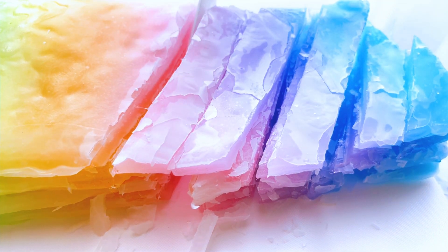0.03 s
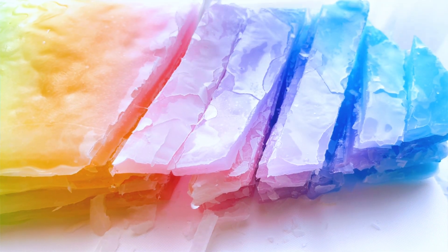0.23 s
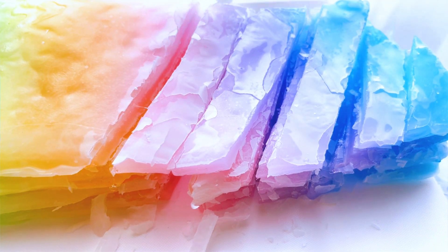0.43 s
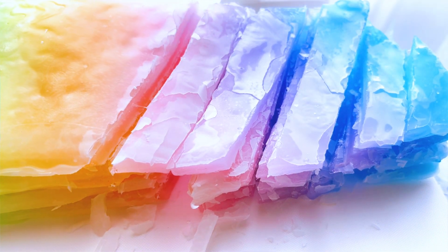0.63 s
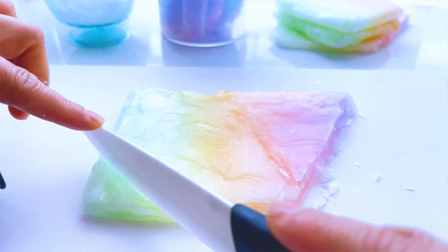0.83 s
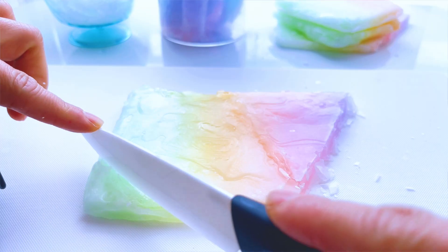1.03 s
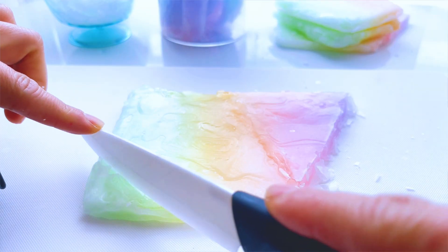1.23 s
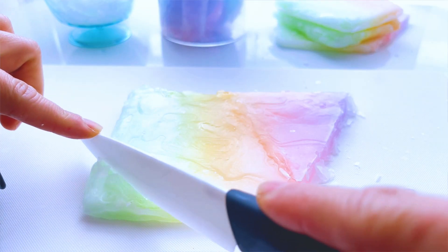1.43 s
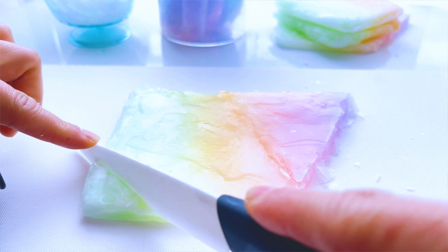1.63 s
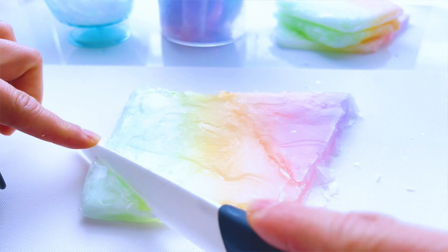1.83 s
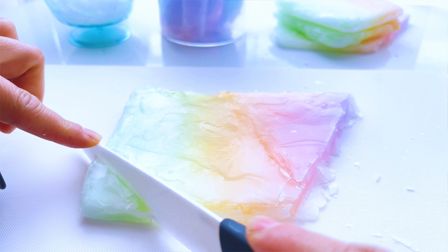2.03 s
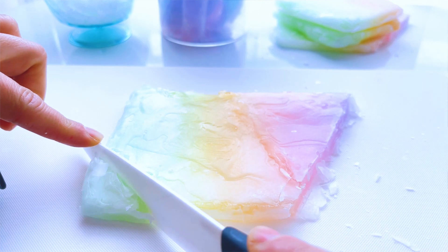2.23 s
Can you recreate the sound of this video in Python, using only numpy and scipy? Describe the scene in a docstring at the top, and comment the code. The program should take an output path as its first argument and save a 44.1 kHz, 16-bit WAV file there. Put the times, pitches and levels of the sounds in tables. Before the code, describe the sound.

Loud cracking crunch of a knife cutting waxed sponge, then a knock and smaller crackles.

```python
"""Knife cutting wax-coated sponge

Two close-up scenes on a board, loud enough to overload the microphone. First a thick block splits:
sharp cracks over a crunch of tiny cells breaking, each crack thumping the block. After a sudden switch,
the knife knocks twice, ticks on a thin slab's crust, breaks in, meets the board and is drawn back."""
import sys
import numpy as np
from scipy import signal
from scipy.fft import rfft, irfft, next_fast_len
from scipy.io import wavfile

SR = 44100
rng = np.random.default_rng(int(sys.argv[2]) if len(sys.argv) > 2 else 0)


def master(y):
    """Save y as 16-bit WAV."""
    cut = np.clip(np.atleast_2d(y).T, -1, 1)
    pcm = np.round(cut * 32767)  # scale
    wavfile.write(sys.argv[1], SR, pcm.astype(np.int16))


N = 100151

# The block's cracks. Each row: start in seconds, level in dB, flake pitch in Hz, thump strength in dB.
CRACKS = [(0.0155, -17.5, 2460, -23), (0.0232, -16.5, 2480, -6.5), (0.036, 0.5, 2680, -15.5),
          (0.1378, -16.5, 2762, -40.5), (0.2746, -22, 2780, -8.5), (.312, 11, 3290, -20.5),
          (0.3251, -5.5, 1830, -23), (0.33, 0, 1900, -7), (0.3453, 2.5, 5000, -4), (0.35, 4, 1165, 0.5),
          (0.366, 11, 1840, -1.5), (.392, 5.5, 3740, -8), (0.419, 7.5, 2537, -0.5),
          (0.4216, 10, 1277, -22.5), (0.4702, -8.5, 2780, -25.5)]
# The tone of a crack. Each row: frequency in Hz, level in dB.
CRACK_TONE = [(200, -16.5), (400, -8), (1200, -10.5), (2100, -4.5), (4500, -12.5), (10300, -16.5),
              (15500, -33.5)]
# The block's weaker notes. Each row: pitch in Hz, level in dB, seconds to fade by 60 dB.
BLOCK_NOTES = [(112, -6, 0.22), (143.8, -5, 0.17), (176, -3.5, 0.19), (261.7, -6, 0.26)]
def cracks():
    """Small flakes snap high and short, large ones low and long; each thumps the block."""
    middle_hz = 2650  # the pitch of a medium flake
    snaps, thumps = np.zeros(N), np.zeros(N)
    for start, db, hz, thump_db in CRACKS:
        snap = burst(CRACK_TONE, fade_s=0.012 * np.sqrt(middle_hz / hz),
                     tilt_db=6 * np.log2(hz / middle_hz))
        flake = ring([(hz, 2.5, 26 / hz)], rise_s=1 / hz)  # dies away in 26 vibrations
        add(snaps, start, amp(db) * (snap + flake))
        # Only hard thumps wake the weaker notes.
        add(thumps, start, amp(1.74 * thump_db) * ring(BLOCK_NOTES, rise_s=0.0036))
    return snaps, thumps


# How loud the crunch is. Each row: time in seconds, level in dB.
CRUNCH_LEVELS = [(0, -36.5), (.022, -15.5), (.06, -27.5), (.125, -32), (.19, -49.5), (.255, -41.5),
                 (.305, -29), (.325, -19), (.44, -19), (.5, -25.5), (.57, -47), (.89, -59.5)]
# The tone of the crunch. Each row: frequency in Hz, level in dB.
CRUNCH_TONE = [(90, -6), (300, -1), (700, -14.5), (1700, -6.5), (2650, -1.5), (3800, -10.5), (10300, -12.5),
               (12300, -22)]
def crunch():
    """The block's tiny cells break, each with a click."""
    return crackle(CRUNCH_LEVELS, CRUNCH_TONE, per_second=800, spread_db=4.5, hiss_db=-4.5)


def main_note():
    """The block's strongest note is one clean vibration, topped up by the thumps and the crunch."""
    hz, t = 219.1, ages()
    pulse = fade(t, fade_s=0.096) * (1 - np.exp(-t * hz))
    strength = np.zeros(N)
    for start, _, _, thump_db in CRACKS:
        add(strength, start, amp(thump_db - 3) * pulse)
    push = level_curve(CRUNCH_LEVELS) ** 1.316  # soft crunch barely feeds the note
    strength += amp(13.5) * signal.fftconvolve(push, pulse / pulse.sum())[:N]
    return strength * np.sin(2 * np.pi * hz * np.arange(N) / SR)


# The knife's knocks. Each row: start in seconds, hit level in dB, treble lift in dB per octave,
# board thud in dB, hollow ring in dB.
KNOCKS = [(1.029, 13, 1, -4.5, 0.5), (1.082, -3, 1, -14.5, -7), (1.463, -3, 6, -19, -25.5),
          (1.4757, -16, 6, -12, -14)]
# The board's notes and the hollow ring. Each row: pitch in Hz, level in dB, seconds to fade by 60 dB.
BOARD_NOTES = [(115.6, -1, 0.19), (212.4, -5.5, 0.21)]
HOLLOW_NOTES = [(761, -5.5, 0.06), (1302, -1, 0.027)]
# The tones of a knock, the tap and the landing. Each row: frequency in Hz, level in dB.
KNOCK_TONE = [(100, -16.5), (350, 2), (580, -5), (1400, -1.5), (2200, -14), (3000, -13), (15500, -24.5)]
TAP_TONE = [(400, -30), (800, -9.5), (1300, -4), (2400, -5.5), (3600, -36)]
LANDING_TONE = [(60, -9), (200, 1.5), (850, 1), (1150, -41)]
def knife():
    """Hollow knocks shake the board; the edge taps the crust, then lands on the board with a dull thud."""
    tap_s, landing_s = 1.4063, 1.636
    hits, thuds = np.zeros(N), np.zeros(N)
    for start, db, tilt_db, thud_db, hollow_db in KNOCKS:
        hit = amp(db) * burst(KNOCK_TONE, fade_s=0.013, tilt_db=tilt_db)
        hollow = amp(hollow_db) * ring(HOLLOW_NOTES, rise_s=0.00046)
        add(hits, start, hit + hollow)
        add(thuds, start, amp(thud_db) * ring(BOARD_NOTES, rise_s=0.0059, sag=1.174))
    add(hits, tap_s, amp(-17.5) * burst(TAP_TONE, fade_s=0.04))
    add(hits, landing_s, amp(6.5) * burst(LANDING_TONE, fade_s=0.02, rise_s=0.0018))
    add(thuds, landing_s, amp(-22) * ring(BOARD_NOTES, rise_s=0.0018))
    return room(hits, wet_db=-12.5) + thuds


# How loud the slicing, the drawn blade and the tearing crust are. Each row: time in seconds, level in dB.
SLICE_LEVELS = [(1.41, -65), (1.458, -40), (1.468, -23.5), (1.53, -30.5), (1.625, -21.5), (1.65, -32.5),
                (1.71, -40)]
DRAW_LEVELS = [(1.66, -44.5), (1.79, -40), (1.93, -35.5), (2.07, -49.5), (2.125, -42.5), (2.21, -49),
               (2.27, -60.5)]
CRUST_LEVELS = [(1.44, -46), (1.466, -22.5), (1.55, -26), (1.65, -42)]
# The tones of those three and of the blade's scrape. Each row: frequency in Hz, level in dB.
SLICE_TONE = [(45, -12.5), (130, 5.5), (550, -11), (780, 3), (1000, -10.5), (1320, -4), (7000, -8.5),
              (15500, -18.5)]
DRAW_TONE = [(550, -32), (800, -2), (1100, -11), (3000, 1), (7000, -8), (10300, -3.5), (12500, -21.5),
             (15500, -19.5)]
CRUST_TONE = [(5500, -17), (10400, 2.5), (12500, -13)]
SCRAPE_TONE = [(2800, -18.5), (5500, 7.5), (7400, -17)]
# Crumbs snapping under the edge. Each row: start in seconds, level in dB.
CRUMBS = [(1.7104, -21), (1.7407, -23), (2.1028, -24)]
def slab():
    """The thin slab tears and crunches under the blade, which then scrapes back through the crumbs."""
    sound = crackle(SLICE_LEVELS, SLICE_TONE, per_second=4500, spread_db=8.5, hiss_db=-17.5)
    sound += crackle(DRAW_LEVELS, DRAW_TONE, per_second=2500, spread_db=7.5, hiss_db=-4)
    sound += crackle(CRUST_LEVELS, CRUST_TONE, per_second=3600, spread_db=6, hiss_db=-19)
    fastest_s, width_s = 1.934, 0.066  # the blade sings where the stroke is fastest
    stroke = np.exp(-((np.arange(N) / SR - fastest_s) / width_s) ** 2)
    sound += amp(-35.5) * stroke * shape_tone(rng.standard_normal(N), SCRAPE_TONE)
    for start, db in CRUMBS:
        add(sound, start, amp(db) * burst(DRAW_TONE, fade_s=0.012))
    return room(sound, wet_db=-12)


# Splits in the wax. Each row: start in seconds, level in dB.
TICKS = [(0.562, -21), (0.811, -24), (1.293, -23), (1.308, -20), (1.32, -20), (1.3345, -22),
         (1.3598, -24.5), (1.402, -14), (1.4335, -14.5), (1.621, -4), (1.827, -13)]
# The tone of a tick. Each row: frequency in Hz, level in dB.
TICK_TONE = [(4000, -33), (10000, 10.5), (12600, 2), (15500, 0.5)]
def ticks():
    """Tiny splits in the wax crust make bright ticks."""
    sound = np.zeros(N)
    for start, db in TICKS:
        add(sound, start, amp(db) * burst(TICK_TONE, fade_s=0.0025))
    return room(sound, wet_db=-5.5)


# How loud the rubbing is. Each row: time in seconds, level in dB.
RUB_LEVELS = [(.45, -22), (.58, -40), (.69, -42.5), (.76, -62), (.858, -98), (.868, -40), (.89, -52)]
# The tone of the rubbing. Each row: frequency in Hz, level in dB.
RUB_TONE = [(1100, -17.5), (1800, 1.5), (2600, -6), (5000, -22.5)]
def rub():
    """The side of the blade rubs inside the cut block."""
    return crackle(RUB_LEVELS, RUB_TONE, per_second=3000, spread_db=1.5, hiss_db=5.5)


# The room's echo. Each row: frequency in Hz, seconds to fade by 60 dB.
ROOM_FADES = [(150, 0.3), (6000, 0.18)]
def room(x, wet_db):
    """A small room adds a short echo at level wet_db; its high notes die first."""
    hz, t, noise = signal.stft(rng.standard_normal(SR // 2), SR, nperseg=256)
    tail = signal.istft(noise * fade(t, look_up(ROOM_FADES, hz)[:, None]), SR, nperseg=256)[1]
    return x + amp(wet_db) * signal.fftconvolve(x, tail / np.linalg.norm(tail))[:N]


# The tone of the rumble. Each row: frequency in Hz, level in dB.
RUMBLE_TONE = [(24, -19.5), (42, 5), (120, -8), (250, -21.5), (3500, -39)]
def rumble():
    """The room rumbles, low and steady."""
    return amp(-49.5) * shape_tone(rng.standard_normal(N), RUMBLE_TONE)


def burst(tone, fade_s, tilt_db=0, rise_s=0.00027):
    """A break or a hit: noise that dies fast."""
    t = ages()
    noise = rng.standard_normal(len(t)) * fade(t, fade_s) * (1 - np.exp(-t / rise_s))
    return shape_tone(noise, tone, tilt_db)


def ring(notes, rise_s, sag=0):
    """Fading notes, their levels varying with each blow; they sink from (1 + sag) times their pitch."""
    t, sag_s = ages(), 0.0089
    turn = 2 * np.pi * (t + sag * sag_s * (1 - np.exp(-t / sag_s)))
    onset = 1 - np.exp(-(t / rise_s) ** 2)
    return onset * sum(amp(db + rng.normal()) * fade(t, fade_s) * np.sin(hz * turn)
                       for hz, db, fade_s in notes)


def crackle(levels, tone, per_second, spread_db, hiss_db):
    """Countless clicks of random size over a fine hiss, following a level curve."""
    sizes = amp(spread_db * np.minimum(rng.exponential(size=N), 3))
    happens = rng.random(N) < per_second / SR
    clicks = unit(happens * sizes * rng.choice([-1, 1], N))
    hiss = amp(hiss_db) * rng.standard_normal(N)
    return shape_tone(level_curve(levels) * unit(clicks + hiss), tone)


def shape_tone(x, tone, tilt_db=0):
    """Filter x by a tone table plus tilt_db per octave above 1000 Hz; white noise keeps its power."""
    size = 2 * next_fast_len(len(x) // 2 + 4096)
    hz = np.fft.rfftfreq(size, 1 / SR)
    octaves = np.log2(np.maximum(hz, 1000) / 1000)
    gain = unit(amp(look_up(tone, hz) + tilt_db * octaves))
    # Fold the filter forward in time, so nothing sounds before the hit.
    cepstrum = irfft(np.log(gain + 1e-6))
    cepstrum[1:size // 2] *= 2
    cepstrum[size // 2 + 1:] = 0
    return irfft(rfft(x, size) * np.exp(rfft(cepstrum)), size)[:len(x)]


def level_curve(levels):
    """Join (seconds, dB) points into a gain for every sample; silent outside them."""
    times, db = np.transpose(levels)
    return amp(np.interp(np.arange(N) / SR, times, db, left=-120, right=-120))


def look_up(points, hz):
    """Read between (Hz, value) points, with octaves evenly spaced."""
    freqs, values = np.transpose(points)
    return np.interp(np.log(hz + 1), np.log(freqs + 1), values)


def fade(t, fade_s):
    """A gain that falls by 60 dB in fade_s seconds."""
    return np.exp(-np.log(1000) * t / fade_s)


def amp(db):
    """Turn decibels into a gain."""
    return 10 ** (np.asarray(db) / 20)


def unit(x):
    """Scale to an average power of 1."""
    return x / np.sqrt(np.mean(x ** 2) + 1e-20)


def ages():
    """Half a second of time after an event."""
    return np.arange(SR // 2) / SR


def add(track, start, sound):
    """Mix a sound in at start seconds."""
    part = track[max(round(start * SR), 0):][:len(sound)]
    part += sound[:len(part)]


def scene():
    """The thick block, then suddenly the thin slab, with ticks and rumble under both."""
    rock_s, switch_s = 0.862, 0.891
    cutting = crunch() + rub()
    snaps, thumps = cracks()
    add(thumps, rock_s, amp(-15.5) * ring(BOARD_NOTES, rise_s=0.0066))  # the block rocks once
    block = room(cutting + snaps, wet_db=-11) + thumps + main_note()
    cuts = np.where(np.arange(N) / SR < switch_s, block, knife() + slab())
    return (cuts + ticks() + rumble())[None]


def record(dry):
    """Overload flattens the loudest peaks, and the highest treble is filtered away."""
    top_hz = 15950
    return signal.sosfilt(signal.butter(36, top_hz, fs=SR, output="sos"), np.clip(dry, -1, 1))


dry = scene()
out = record(dry)
master(out)
```